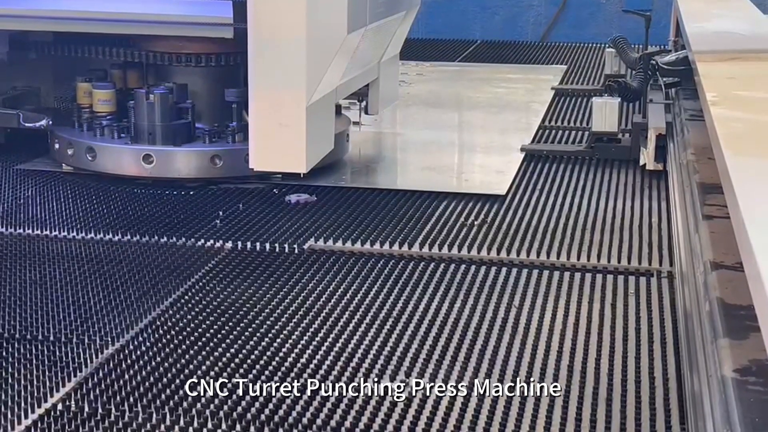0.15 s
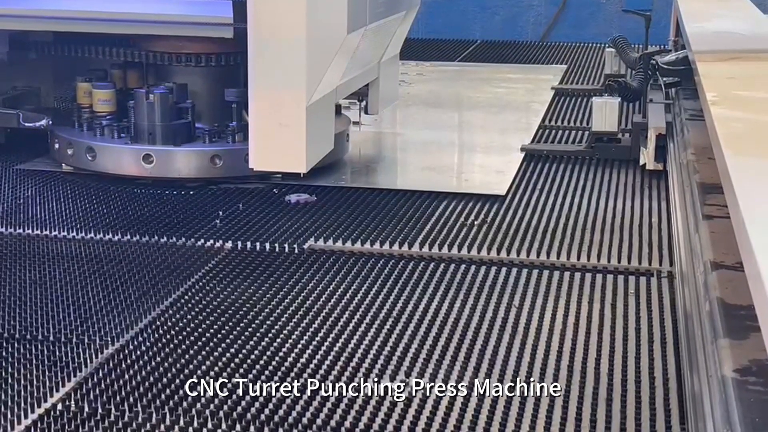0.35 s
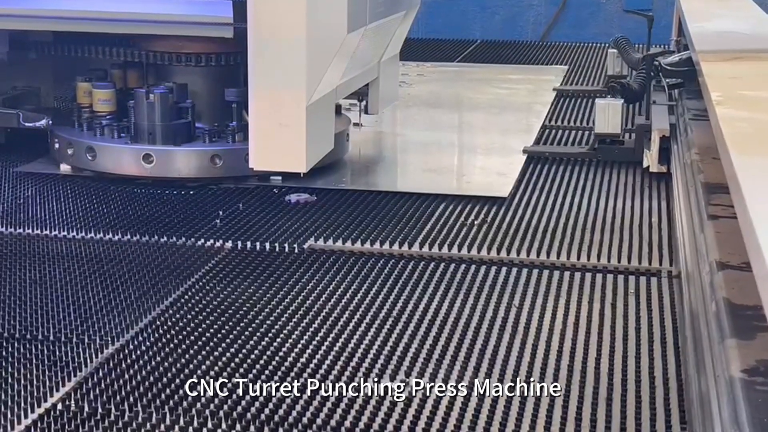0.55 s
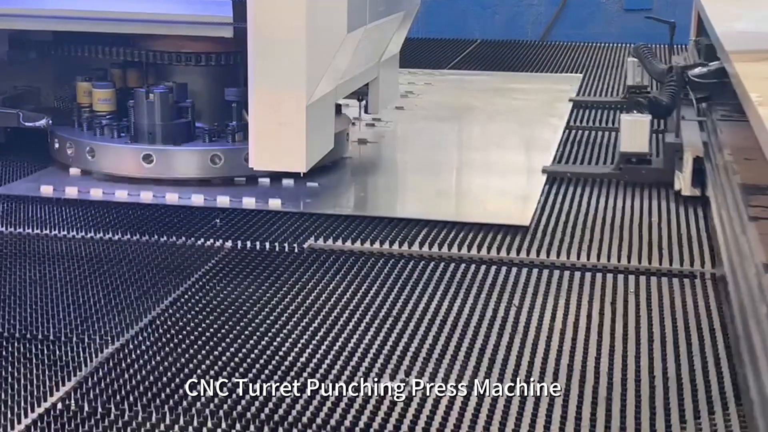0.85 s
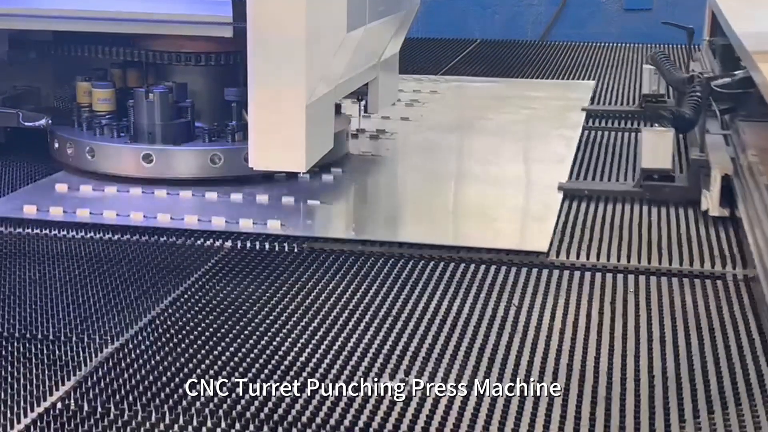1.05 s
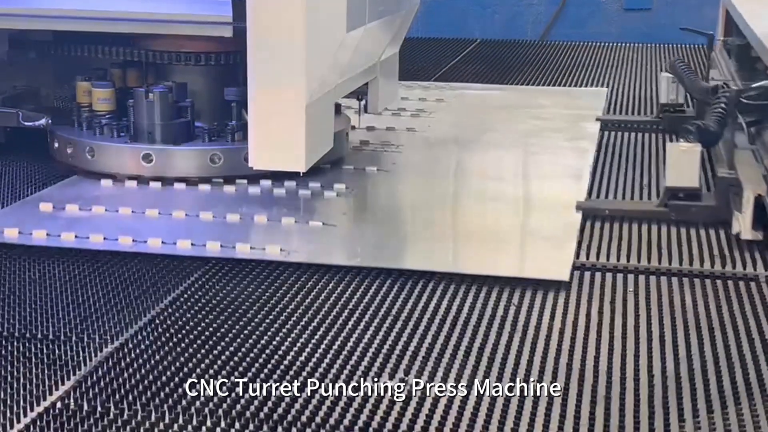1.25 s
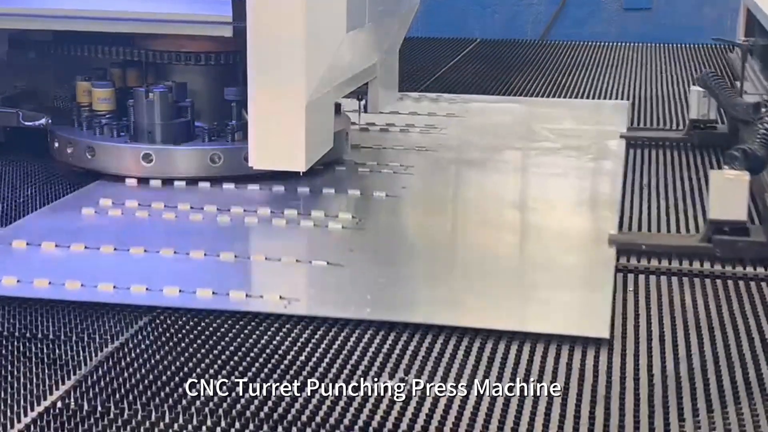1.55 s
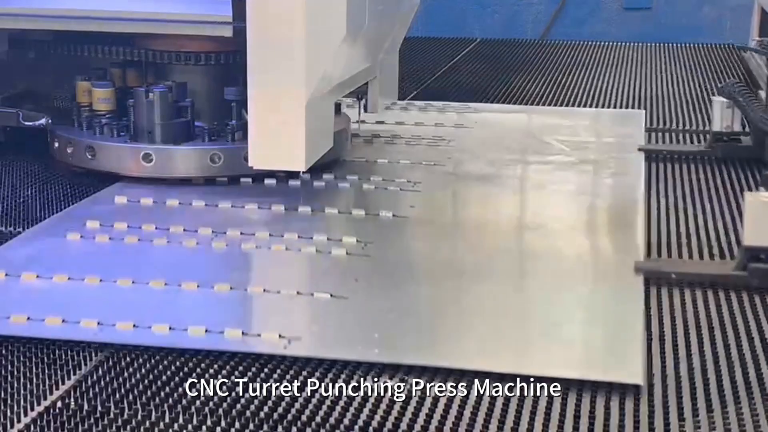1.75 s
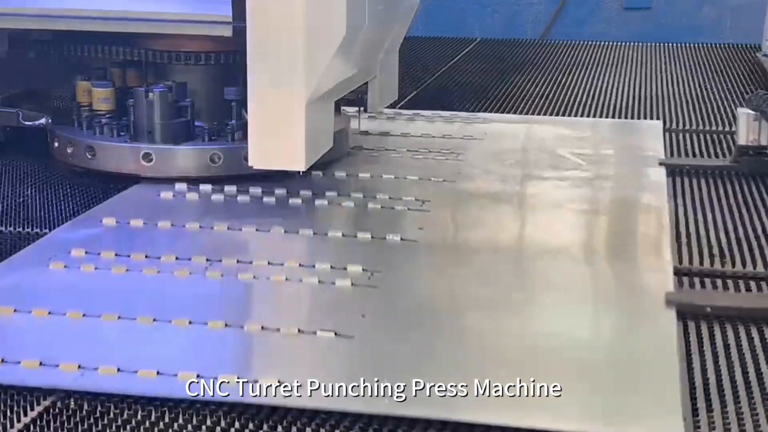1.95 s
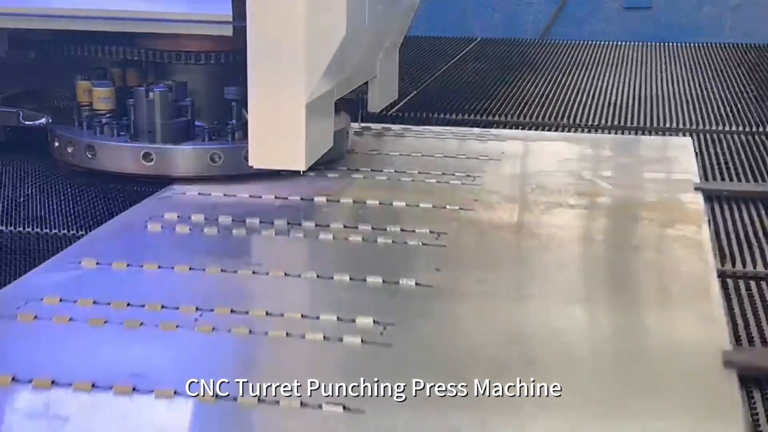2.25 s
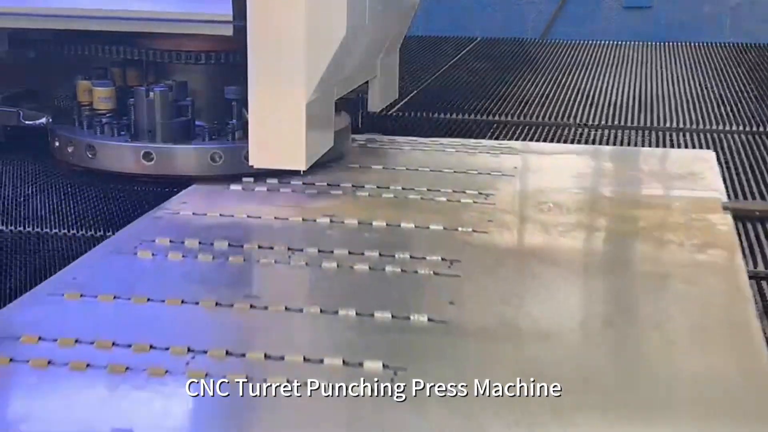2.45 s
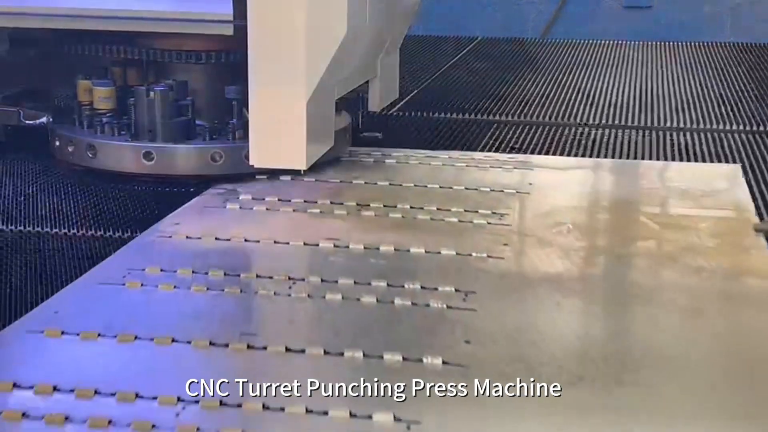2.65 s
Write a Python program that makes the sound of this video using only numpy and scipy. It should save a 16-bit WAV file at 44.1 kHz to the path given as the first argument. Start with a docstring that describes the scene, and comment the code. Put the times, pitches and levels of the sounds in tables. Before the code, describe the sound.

A punch press hums low and steadily in a workshop. At 0.32 s one violent stroke, a tight cluster of blows until 0.42, cracks and clangs through sheet steel, with a ringing tool and deep boom. Faint squeaks follow; from about 0.6 the sheet drags, rumbling, scraping, rattling and droning over hissing bristles. Sharp knocks come at 2.04-2.66, a sinking moan near 2.2-2.5, then it slows around 2.7.

```python
"""A turret punch press hums in a workshop: steady sine lines over shaped noise. One stroke bangs through the
steel sheet as bursts of contacts; the tool rings, the frame booms and the table shudders.
Then the carriage drags the sheet fast across the brush table: random contacts make it rumble, scrape and
rattle, the bristles hiss, the sheet slaps, a tone drones, metal squeaks, punched edges knock and a late
moan sinks, before the carriage slows. The microphone has a notch in its treble."""
import sys
import numpy as np
from scipy import signal
from scipy.fft import rfft, irfft
from scipy.io import wavfile

SR = 44100
rng = np.random.default_rng(int(sys.argv[2]) if len(sys.argv) > 2 else 0)


def wrap_up_sound(samples):
    """Save the sound to the file named by the first command line argument, as 16-bit audio."""
    columns = np.atleast_2d(samples).T
    # keep every value between -1 and 1, then stretch to whole-number steps
    tamed = np.clip(columns, -1, 1)
    steps = np.round(tamed * 32767).astype(np.int16)
    wavfile.write(sys.argv[1], SR, steps)


N = 123479  # samples


def amp(db):
    """Logarithmic level: decibels to amplitude gain."""
    return 10 ** (np.asarray(db) / 20)


def unit(x):
    """Normalisation of power: scales to rms 1."""
    return x / np.sqrt(np.mean(x ** 2) + 1e-20)


def decay(t, t60):
    """Exponential decay: damping takes 60 dB off the level in t60 seconds."""
    return np.exp(-np.log(1000) * t / t60)


def curve(rows, axis=1):
    """Linear interpolation: one column of a time table, at every sample."""
    rows = np.array(rows)
    return np.interp(np.arange(N) / SR, rows[:, 0], rows[:, axis])


def add(mix, s, sound):
    """Superposition: adds a sound to the mix from time s on."""
    part = mix[round(s * SR):][:len(sound)]
    part += sound[:len(part)]


def after(s):
    """Gating: opens over 5 ms from time s."""
    return np.clip((np.arange(N) / SR - s) * 200, 0, 1)


def colour(x, points):
    """Linear filtering: shapes the spectrum of x, at rms 1."""
    hz, db = np.transpose(points)
    size = 2 ** 17
    f = np.fft.rfftfreq(size, 1 / SR)
    gain = amp(np.interp(np.log(f + 1), np.log(hz), db))
    return unit(irfft(rfft(x, size) * gain)[:N])


def drift(rate_hz):
    """Low-passed noise: slow random wandering, rms 1."""
    f = np.fft.rfftfreq(N, 1 / SR)
    return unit(irfft(rfft(rng.standard_normal(N)) * np.exp(-(f / rate_hz) ** 2), N))


def contacts(per_s, spread_db):
    """Random impulse train: tiny impacts of uneven size and either sign."""
    size = amp(spread_db * np.minimum(rng.exponential(1, N), 4))
    return size * rng.choice([-1, 1], N) * (rng.random(N) < per_s / SR)


def resonate(x, hz, width):
    """Resonance: a steep peak, width in Hz, that may follow a pitch curve, at rms 1."""
    turn = np.exp(2j * np.pi * np.cumsum(hz * np.ones(N)) / SR)
    r = np.exp(-np.pi * width / SR)
    # shift the resonance to 0 Hz, low-pass there, shift back
    low = signal.lfilter([(1 - r) ** 2], [1, -2 * r, r * r], x / turn + 1e-18)
    return unit((turn * low).real)


FRONT_DB, FRONT_T60 = 3, .014  # front relative to the ring, seconds
ROOM_DB, ROOM_T60, ROOM_TREBLE_T60 = -5.5, 0.95, 0.33  # tail relative to the ring, seconds


def burst(points, db, t60, rise_s, room_t60):
    """Impact excitation: a hard front and the dense ring of struck steel, then the workshop's tail."""
    t = np.arange(N) / SR
    ring = np.hypot(decay(t, t60), amp(FRONT_DB) * decay(t, FRONT_T60))
    shape = np.hypot(ring, amp(ROOM_DB) * decay(t, room_t60))
    grain = colour(contacts(per_s=3500, spread_db=1.0), points)
    return amp(db) * (1 - np.exp(-t / rise_s)) * shape * grain


STEEL_T60, STEEL_SHARE = 0.13, 0.34  # seconds, share of power that rings on


def steel(x):
    """Modal reverberation: the dense high modes of the sheet ring on after each contact."""
    t = np.arange(SR // 4) / SR
    ring = rng.standard_normal(len(t)) * decay(t, STEEL_T60)
    ringing = signal.fftconvolve(x, ring / np.linalg.norm(ring))[:N]
    return np.sqrt(1 - STEEL_SHARE) * x + np.sqrt(STEEL_SHARE) * ringing


# Idling motor and pump. Each row: frequency in Hz, mean level in dB rms.
HUM_LINES = [(48.4, -47), (79, -61), (160, -56), (318, -35), (403.7, -48.5), (640.6, -51.5), (888, -47.5),
             (1400, -58), (2239, -66), (4161, -66), (6002, -65.5)]
# Spectrum of the workshop air. Each row: frequency in Hz, relative density in dB per Hz.
AIR_SPECTRUM = [(20, -25), (55, 3.5), (120, -3.5), (400, -12), (800, -21.5), (1100, -32), (1600, -25),
                (3000, -36.5), (6000, -44), (9000, -49.5), (14000, -44.5)]
AIR_DB = -33.5
HUM_WAVER_DB, HUM_WAVER = .7, .001  # rms level waver in dB, rms pitch waver as a share


def idle():
    """Line spectrum of rotating machines: wavering motor tones over the broadband workshop air."""
    out = amp(AIR_DB) * colour(rng.standard_normal(N), AIR_SPECTRUM)
    for hz, db in HUM_LINES:
        turns = np.cumsum(hz * (1 + HUM_WAVER * drift(30.0))) / SR + rng.random()
        level = np.sqrt(2) * amp(db + HUM_WAVER_DB * drift(5.1))
        out += level * np.sin(2 * np.pi * turns)
    return out


# Level of the deep shudder of the table. Each row: time in seconds, level in dB.
SHUDDER_LEVEL = [(.325, -25.5), (.4, -36), (.66, -23), (.76, -40), (.9, -24.5), (1.05, -57), (1.85, -42),
                 (2.06, -28.5), (2.3, -34), (2.8, -32.5)]
# Spectrum of the shudder. Each row: frequency in Hz, relative density in dB per Hz.
SHUDDER_SPECTRUM = [(20, -29), (45, -26), (68, 5.5), (90, 7), (130, -29), (300, -50)]


def shudder():
    """Forced vibration: deep shaking of the table, set off by the stroke."""
    return amp(curve(SHUDDER_LEVEL)) * colour(rng.standard_normal(N), SHUDDER_SPECTRUM)


# Blows of the punch stroke, entry then stripping.
# Each row: start in seconds, then the ring levels of crack, clang and thud in dB.
STROKE_BLOWS = [(0.3206, -21.5, -23, -30), (0.3239, -29, -22, -31.5), (.3305, -30, -22.5, -26),
                (0.3481, -37, -20, -15), (0.372, -28, -32, -34), (0.3778, -49, -19.5, -25),
                (.383, -30, -47, -30), (.413, -42, -31, -14.5)]
# Spectra of a blow's three parts. Each row: frequency in Hz, relative density in dB per Hz.
CRACK_SPECTRUM = [(800, -18), (2400, 5.5), (3100, 1.5), (3750, 3.5), (5000, -2), (7000, -6), (9500, -11),
                  (11300, -3), (14000, -5)]
CLANG_SPECTRUM = [(150, 1), (400, 4), (880, 3.5), (1300, -5), (2400, -5.5), (3300, -16), (6000, -20.5),
                  (14000, -53)]
THUD_SPECTRUM = [(25, -21), (80, 1), (125, -6.5), (172, 6.5), (240, -5), (330, -0.5), (600, -22),
                 (2000, -41)]
CRACK_T60, CLANG_T60, THUD_T60 = 0.05, 0.095, 0.24  # seconds
# Modes of the punch tool. Each row: frequency in Hz, starting peak level in dB, T60 in seconds.
TOOL_MODES = [(875, -22.5, 0.27), (1190, -29, 0.55), (2070, -26, 0.12), (2460, -35, 0.22),
              (3610, -37, 0.52), (3990, -38, 0.13), (5200, -30, 0.12), (10400, -28, 0.1),
              (13120, -38, .075)]
# Boom of the frame. The row: start in seconds, frequency in Hz, peak level in dB of the decay
# before the rise is applied, rise in seconds, T60 in seconds.
FRAME_BOOM = (.385, 77.5, -11.5, .065, .85)


def punch():
    """Impact and free vibration: blows crack, clang and thud; the tool rings, the heavy frame swings on."""
    out, t = np.zeros(N), np.arange(N) / SR
    for s, crack_db, clang_db, thud_db in STROKE_BLOWS:
        add(out, s, burst(CRACK_SPECTRUM, crack_db, CRACK_T60, rise_s=0.00018, room_t60=ROOM_TREBLE_T60))
        add(out, s, burst(CLANG_SPECTRUM, clang_db, CLANG_T60, rise_s=0.00057, room_t60=ROOM_T60))
        add(out, s, burst(THUD_SPECTRUM, thud_db, THUD_T60, rise_s=0.0015, room_t60=ROOM_T60))
    entry_s = STROKE_BLOWS[0][0]
    for hz, db, t60 in TOOL_MODES:
        add(out, entry_s, amp(db) * decay(t, t60) * np.sin(2 * np.pi * hz * t))
    s, hz, db, rise_s, t60 = FRAME_BOOM
    swing = np.minimum(t / rise_s, 1) * decay(t, t60)
    add(out, s, amp(db) * swing * np.sin(2 * np.pi * hz * t))
    return out


# Friction levels of the sheet. Each row: time in seconds, rumble level in dB,
# scrape level in dB before the offsets of scrape and slaps.
SHEET_LEVELS = [(.33, -43, -33), (.52, -25.5, -32), (.64, -21.5, -26), (.8, -21, -25), (1.02, -18, -22.5),
                (1.25, -19.5, -25), (1.45, -20.5, -25), (1.8, -21, -25), (2.08, -18.5, -27.5),
                (2.25, -23.5, -28.5), (2.65, -21.5, -29.5), (2.8, -23, -31.5)]
# Spectra of rumble and scrape. Each row: frequency in Hz, relative density in dB per Hz.
RUMBLE_SPECTRUM = [(25, -38), (55, -45), (80, -20), (105, -7.5), (122, -6.5), (150, 0.5), (182, 3),
                   (215, -1.5), (250, 0), (280, -4.5), (400, -3.5), (520, -8), (800, -21), (2000, -47.5)]
SCRAPE_SPECTRUM = [(200, -35), (450, 1), (720, 1), (790, -5), (860, 1.5), (1150, -2.5), (1350, -5),
                   (1530, -4), (1630, -4.5), (1720, -10.5), (2000, -6), (3000, -29.5), (8000, -45)]
SCRAPE_OFFSET_DB = -1


def sheet():
    """Friction as repeated impact: many small contacts make the dragged sheet rumble and scrape."""
    rumble = colour(contacts(per_s=2000, spread_db=0.7), RUMBLE_SPECTRUM)
    scrape = colour(steel(contacts(per_s=2000, spread_db=1.0)), SCRAPE_SPECTRUM)
    surge_db = 0.5 * drift(31)
    scrape_db = curve(SHEET_LEVELS, axis=2) + SCRAPE_OFFSET_DB + surge_db
    return amp(curve(SHEET_LEVELS, axis=1)) * rumble + amp(scrape_db) * scrape


SLAPS_PER_S, SLAP_SPREAD_DB, SLAP_OFFSET_DB = 48, 1.5, -6.5  # offset from the scrape column
SLAP_LOW_HZ, SLAP_HIGH_HZ, SLAP_T60 = 518.6, 2480, .11
SLAP_BEND, SLAP_TILT = 0.0217, -1.07  # rms phase stretch after one T60, exponent of amplitude on pitch
SLAP_TICK, SLAP_TICK_T60 = 0.85, 0.01  # tick amplitude relative to the ring, seconds


def slaps(count=4):
    """Modes of a flexing plate: each slap ticks and rings a few partials that bend in pitch."""
    out, t = np.zeros(N), np.arange(SR // 8) / SR
    band = signal.butter(5, (SLAP_LOW_HZ, SLAP_HIGH_HZ), "band", fs=SR, output="sos")
    for slot in np.arange(0, N / SR, 1 / SLAPS_PER_S):
        hz = SLAP_LOW_HZ * (SLAP_HIGH_HZ / SLAP_LOW_HZ) ** rng.random((count, 1))
        bend = SLAP_BEND * rng.standard_normal((count, 1)) * t / SLAP_T60
        partials = (hz / SLAP_LOW_HZ) ** SLAP_TILT * np.sin(2 * np.pi * hz * t * (1 + bend))
        ring = unit(partials.sum(0))
        tick = unit(signal.sosfilt(band, rng.standard_normal(len(t))))
        sound = ring * decay(t, SLAP_T60) + SLAP_TICK * tick * decay(t, SLAP_TICK_T60)
        start = slot + rng.random() / SLAPS_PER_S
        add(out, start, amp(SLAP_SPREAD_DB * rng.standard_normal()) * sound)
    return amp(curve(SHEET_LEVELS, axis=2) + SLAP_OFFSET_DB) * unit(out)


# Drone of the moving carriage and sheet. Each row: time in seconds, frequency in Hz, level in dB.
DRONE_PATH = [(0.62, 349, -29.5), (0.67, 330, -22.5), (0.94, 328, -21.5), (1.02, 363, -26),
              (1.1, 327, -25.5), (1.3, 326, -22.5), (1.36, 304, -16), (1.38, 344, -29), (1.53, 381, -29.5),
              (1.55, 364, -21.5), (1.86, 354, -24), (1.91, 334, -22.5), (2.18, 345, -24.5),
              (2.29, 380, -32), (2.36, 333, -23), (2.42, 356, -23.5), (2.72, 361, -25), (2.78, 366, -31)]
MOVE_S, DRONE_SWELL_S = .36, .33  # start of travel, length of the swell
DRONE_WIDTH_HZ, DRONE_CLEAN, DRONE_WAVER = 34, 0.4, 0.016  # Hz, share of power, rms share of pitch


def drone():
    """Tone and narrow-band noise: the moving carriage and sheet sing, swelling as they start."""
    hz = curve(DRONE_PATH, axis=1)
    tone = unit(np.sin(2 * np.pi * np.cumsum(hz * (1 + DRONE_WAVER * drift(18.2))) / SR))
    fuzz = resonate(rng.standard_normal(N), hz, DRONE_WIDTH_HZ)
    swell = np.clip((np.arange(N) / SR - MOVE_S) / DRONE_SWELL_S, 0, 1)
    mixed = np.sqrt(DRONE_CLEAN) * tone + np.sqrt(1 - DRONE_CLEAN) * fuzz
    return swell * amp(curve(DRONE_PATH, axis=2)) * mixed


# Modes of the rattling sheet, changing as it slides out. Each row: frequency in Hz, width in Hz,
# relative level in dB at first, relative level in dB at last.
SHEET_MODES = [(700, 78, -8, -9), (833, 66, 4, -8), (1281.5, 21.5, 4, -7), (1368, 91, 0, -10),
               (1722, 38, 1, -3), (1823, 114, 1.5, -3.5), (1937, 75, -40, -5), (2118, 29, -0.5, -1),
               (2225, 85, -10, -0.5), (2330, 126, -4.5, -3.5), (2623, 34, -8, -9.5), (2940, 66, -12, -16)]
SLIDE_START_S, SLIDE_END_S = 1.0, 2.12
RATTLES_PER_S, RATTLE_SPREAD_DB = 400, 3
RING_WANDER, RING_WANDER_HZ = .005, 7  # rms share of pitch, rate of wandering


def rattle():
    """Modal response: random taps excite the resonances of the sheet, at rms 1."""
    taps, t = contacts(RATTLES_PER_S, RATTLE_SPREAD_DB), np.arange(N) / SR
    out = np.zeros(N)
    for hz, width, first_db, last_db in SHEET_MODES:
        level = amp(np.interp(t, (SLIDE_START_S, SLIDE_END_S), (first_db, last_db)))
        out += level * resonate(taps, hz * (1 + RING_WANDER * drift(RING_WANDER_HZ)), width)
    return unit(out)


# Spectrum of bristles flicking under the sheet. Each row: frequency in Hz, relative density in dB per Hz.
BRISTLE_SPECTRUM = [(500, -4), (2300, 6), (3200, -0.5), (4000, 3), (5200, 2), (7500, -2.5), (9300, -7),
                    (10500, -2), (13000, 1.5), (14200, -9.5)]
FLICKS_PER_S, FLICK_SPREAD_DB = 10000, 2.5


def bristles():
    """Dense shot noise: thousands of flicks each second merge into a hiss, at rms 1."""
    return colour(steel(contacts(FLICKS_PER_S, FLICK_SPREAD_DB)), BRISTLE_SPECTRUM)


# Carriage speed. Each row: time in seconds, share of top speed.
CARRIAGE_SPEED = [(.4, 0.12), (.56, 0.073), (.63, 0.42), (.72, 0.8), (.95, 0.8), (1.5, 0.84), (2.05, 1),
                  (2.45, 0.93), (2.66, 0.93), (2.72, 0.37), (2.8, 0.48)]
RATTLE_DB, BRISTLE_DB = -27.5, -35  # at top speed


def brush_table():
    """Power law of speed: rattle and hiss both grow with speed and flutter together."""
    speed = curve(CARRIAGE_SPEED)
    flutter_db = 0.92 * drift(28)
    rattling = amp(RATTLE_DB) * speed ** 1.2 * rattle()
    hissing = amp(BRISTLE_DB) * speed ** 1.27 * bristles()
    return amp(flutter_db) * (rattling + hissing)


# Short squeaks as the carriage starts. Each row: start in seconds, length in seconds, gate peak in dB.
START_SQUEAKS = [(0.392, .02, -44), (0.468, 0.024, -44.5), (0.541, 0.017, -46), (0.58, 0.01, -47.5)]
SQUEAK_HZ = 6140


def squeaks():
    """Narrow-band resonance: gated noise gives brief high squeaks of sliding metal."""
    gate = np.zeros(N)
    for s, length, db in START_SQUEAKS:
        add(gate, s, amp(db) * np.sqrt(np.hanning(round(length * SR)).clip(0)))
    return gate * resonate(rng.standard_normal(N), SQUEAK_HZ, width=250)


# Knocks of the moving sheet. Each row: start in seconds, ring level of click in dB, of body in dB.
SHEET_KNOCKS = [(0.6213, -39, -43), (.962, -54, -39), (1.039, -48, -42), (1.0696, -44, -32),
                (1.181, -50, -30), (1.71, -56, -31), (1.7526, -41, -35), (2.0408, -25.5, -26),
                (2.062, -40, -22), (2.364, -31.5, -30), (2.461, -36.5, -30.5), (2.5563, -31, -28),
                (2.656, -35, -34)]
# Spectra of click and body. Each row: frequency in Hz, relative density in dB per Hz.
CLICK_SPECTRUM = [(1000, -10), (2400, 22), (3600, 16), (5400, 17.5), (7500, 9.5), (10000, 3), (13300, 8)]
BODY_SPECTRUM = [(40, -14), (75, -4), (130, -26), (380, -17), (600, -27), (1300, 3.5), (2400, 1),
                 (4000, -16)]
CLICK_T60, BODY_T60 = .07, 0.086  # seconds
BOUNCE_S, BOUNCE_DB = .006, 1  # delay after the click, level relative to it


def knocks():
    """Repeated impact: the punched sheet catches on the table with a click, a bounce and a clatter."""
    out, room = np.zeros(N), ROOM_TREBLE_T60
    for s, click_db, body_db in SHEET_KNOCKS:
        bounce_db = click_db + BOUNCE_DB
        add(out, s, burst(CLICK_SPECTRUM, click_db, CLICK_T60, rise_s=0.00017, room_t60=room))
        add(out, s + BOUNCE_S, burst(CLICK_SPECTRUM, bounce_db, CLICK_T60, rise_s=0.0003, room_t60=room))
        add(out, s, burst(BODY_SPECTRUM, body_db, BODY_T60, rise_s=0.0031, room_t60=room))
    return out


# A sinking moan as the sheet slides out. Each row: time in seconds, frequency in Hz, level in dB.
MOAN_PATH = [(2.12, 535, -73), (2.23, 530, -27), (2.34, 503, -30.5), (2.41, 484, -35), (2.5, 470, -75)]


def moan():
    """Gliding resonance: one narrow band of noise stands out briefly and sinks in pitch."""
    ringing = resonate(rng.standard_normal(N), curve(MOAN_PATH, axis=1), width=17)
    return amp(curve(MOAN_PATH, axis=2)) * ringing


STROKE_S = .315  # the shudder sets in


def scene():
    """Superposition of sources: the press idles, punches and moves the sheet."""
    stroke = after(STROKE_S) * shudder() + punch()
    travel = after(MOVE_S) * (sheet() + slaps() + drone() + brush_table() + moan())
    return (idle() + stroke + travel + squeaks() + knocks())[None]


NOTCH_HZ, NOTCH_WIDTH_HZ, NOTCH_DB = 8473, 265, -70  # centre, half-width scale, gain at the centre
EDGE_HZ = 14200  # upper band limit


def record(dry):
    """Frequency response: the microphone's treble notch, then the band limit."""
    f = np.fft.rfftfreq(N, 1 / SR)
    notch = amp(NOTCH_DB / (1 + ((f - NOTCH_HZ) / NOTCH_WIDTH_HZ) ** 2) ** 1.75)
    heard = irfft(rfft(dry) * notch, N)
    low_pass = signal.firwin(511, EDGE_HZ, window=("kaiser", 9), fs=SR)
    return signal.oaconvolve(heard, low_pass[None], "same")


dry = scene()
out = record(dry)
wrap_up_sound(out)
```